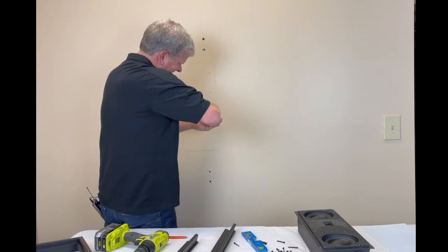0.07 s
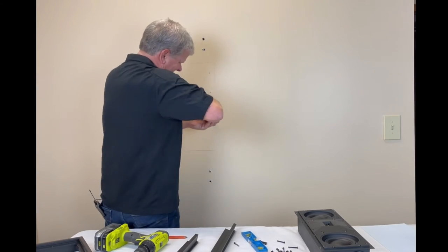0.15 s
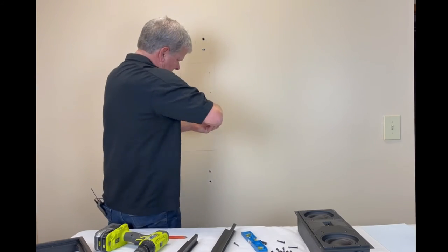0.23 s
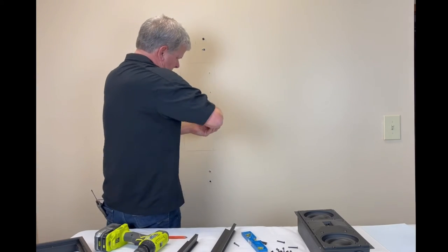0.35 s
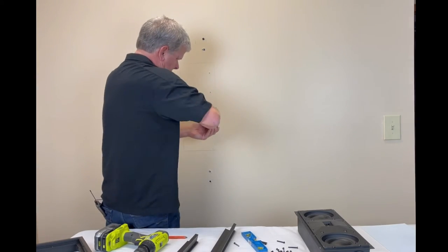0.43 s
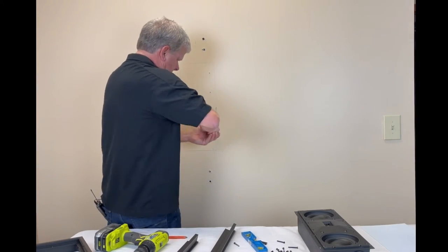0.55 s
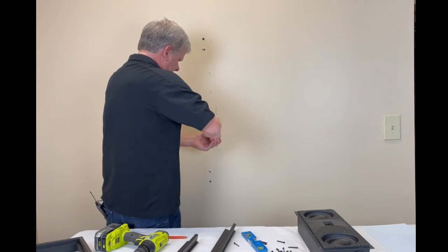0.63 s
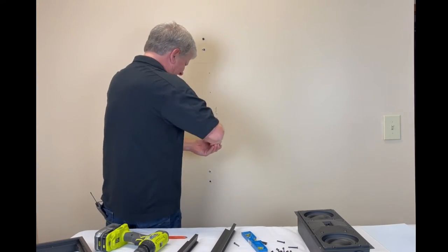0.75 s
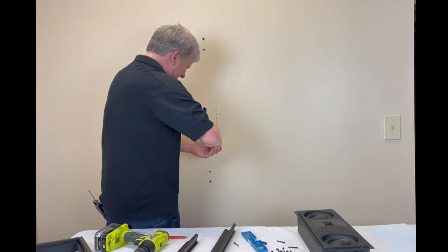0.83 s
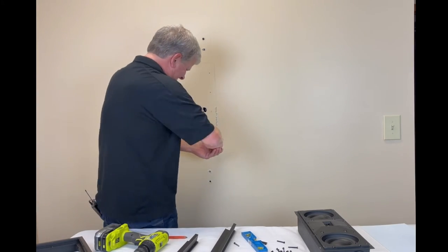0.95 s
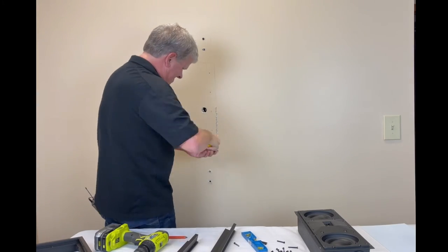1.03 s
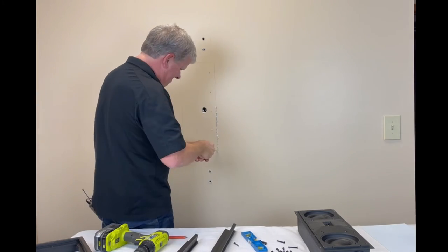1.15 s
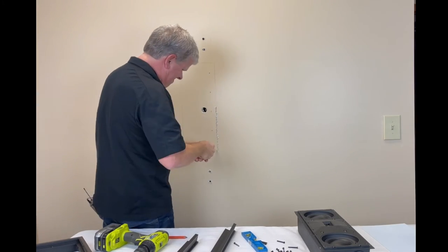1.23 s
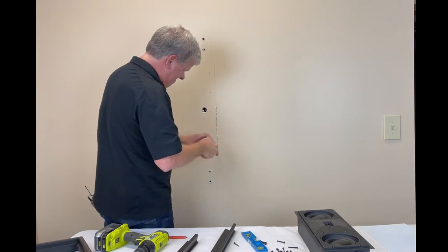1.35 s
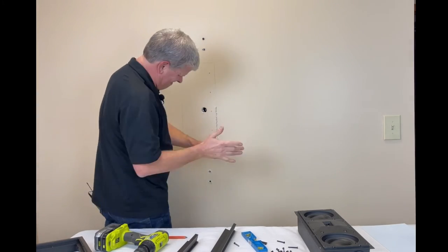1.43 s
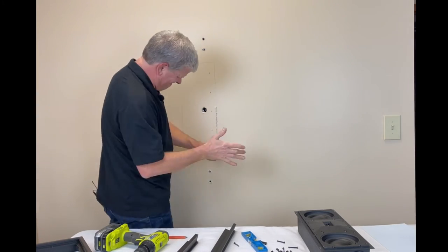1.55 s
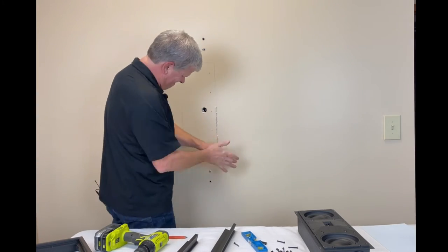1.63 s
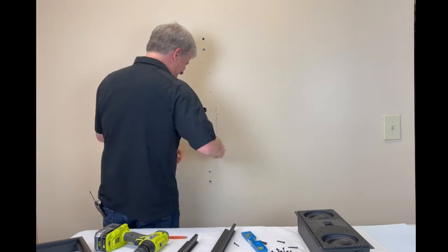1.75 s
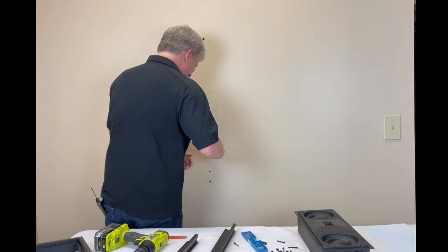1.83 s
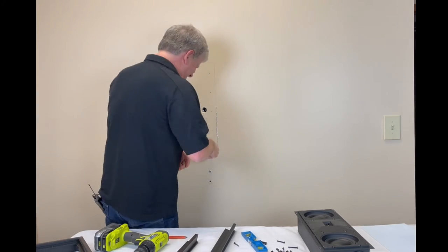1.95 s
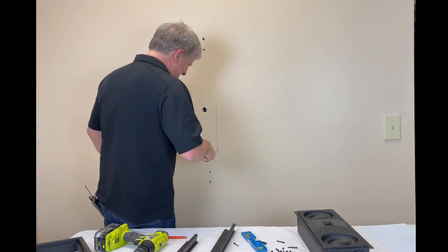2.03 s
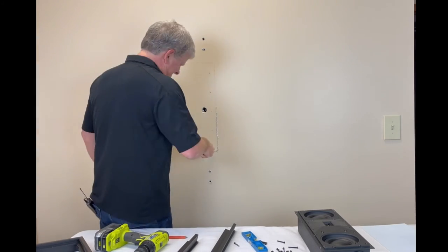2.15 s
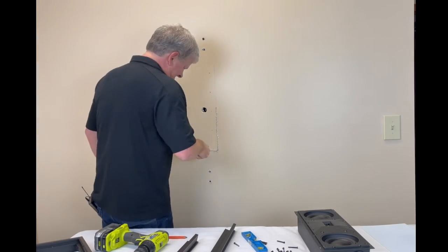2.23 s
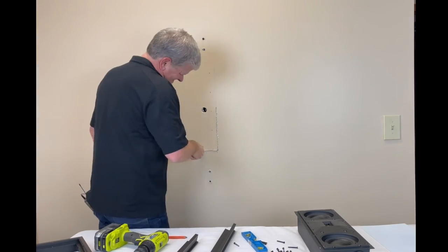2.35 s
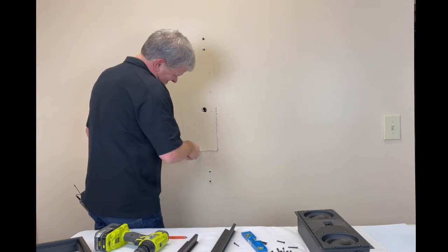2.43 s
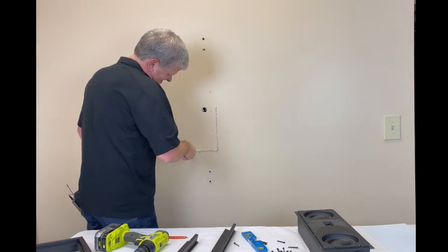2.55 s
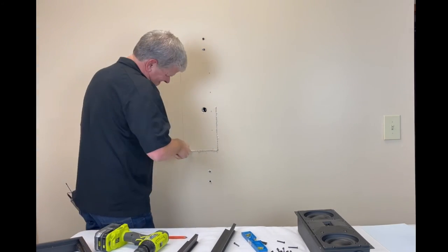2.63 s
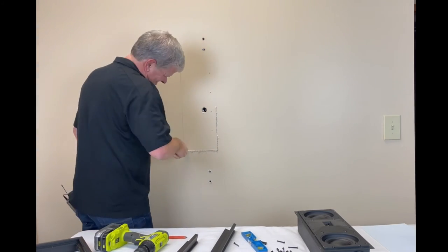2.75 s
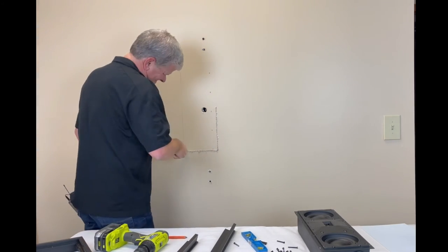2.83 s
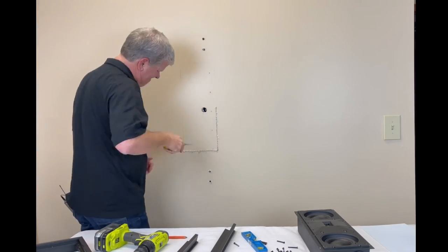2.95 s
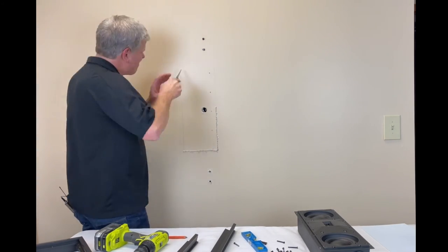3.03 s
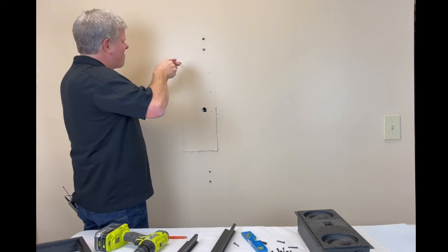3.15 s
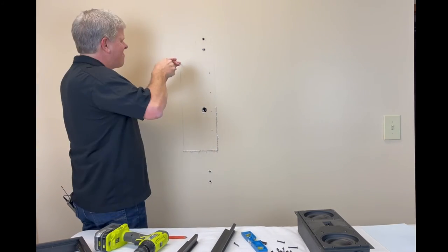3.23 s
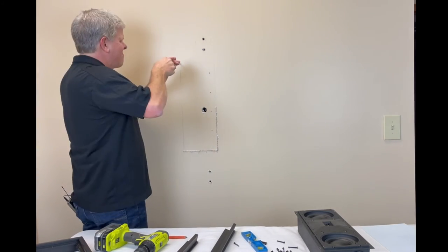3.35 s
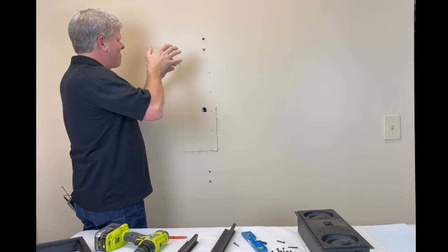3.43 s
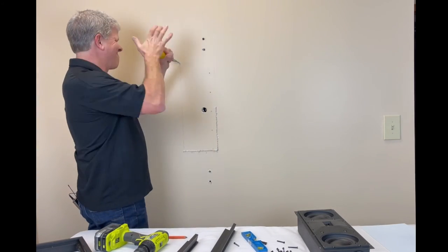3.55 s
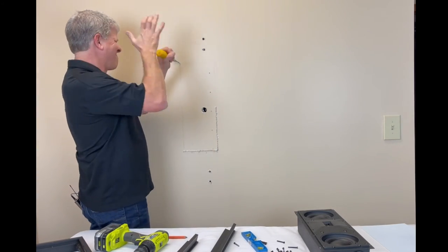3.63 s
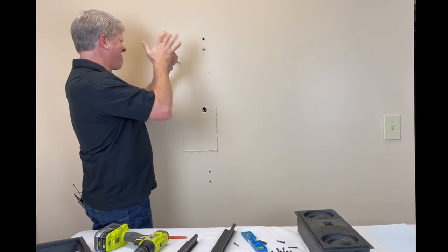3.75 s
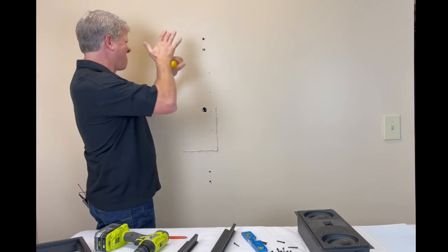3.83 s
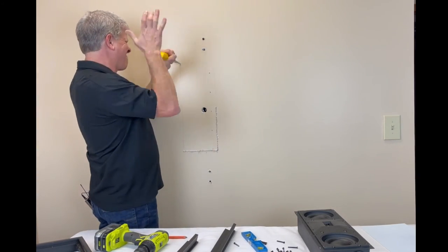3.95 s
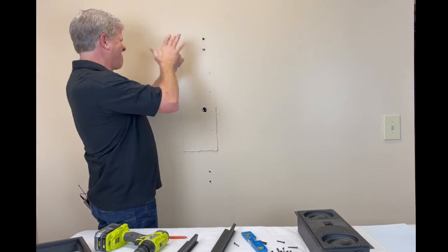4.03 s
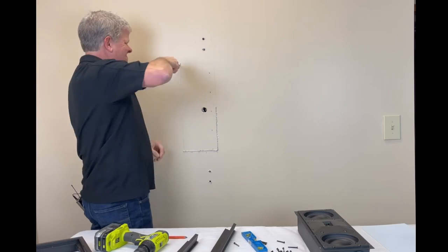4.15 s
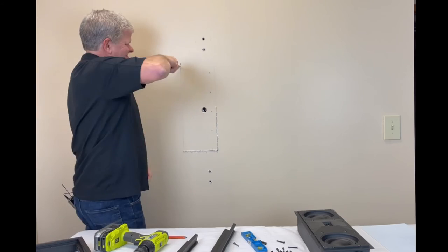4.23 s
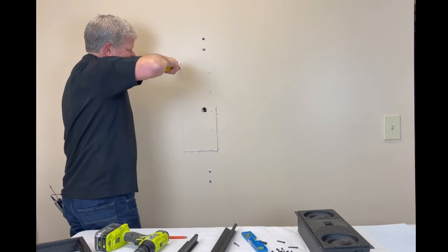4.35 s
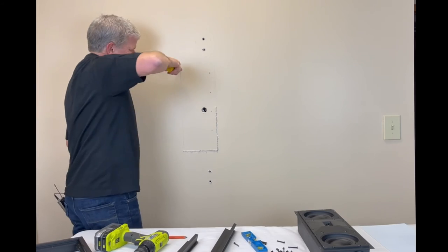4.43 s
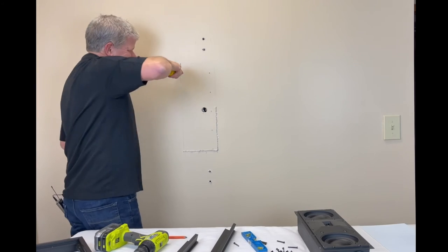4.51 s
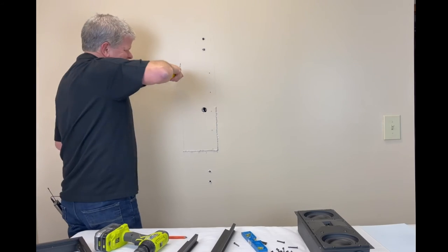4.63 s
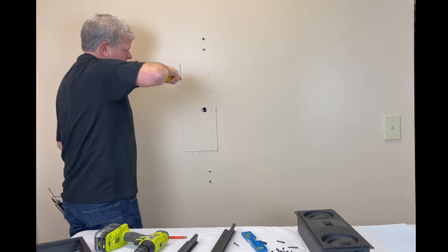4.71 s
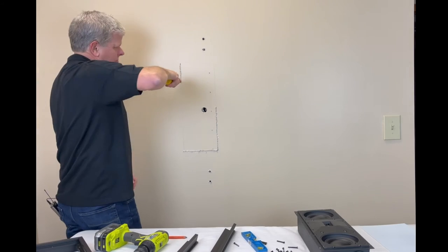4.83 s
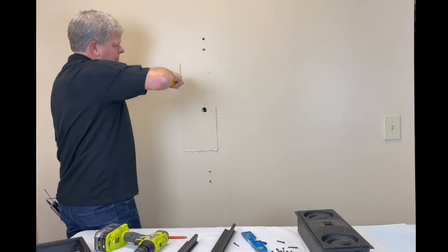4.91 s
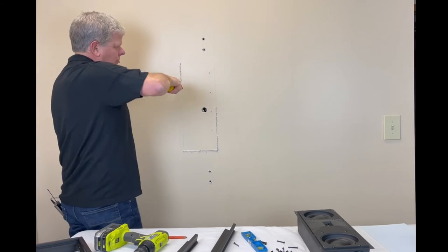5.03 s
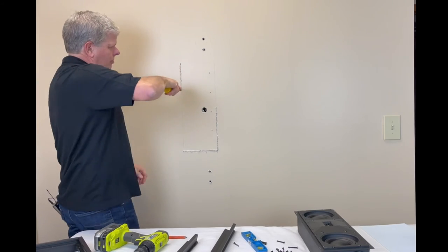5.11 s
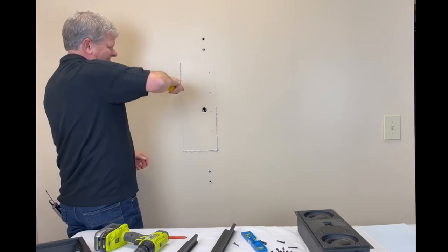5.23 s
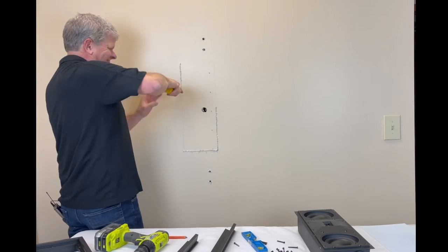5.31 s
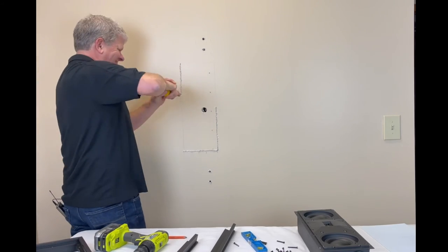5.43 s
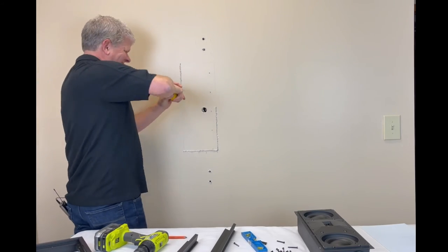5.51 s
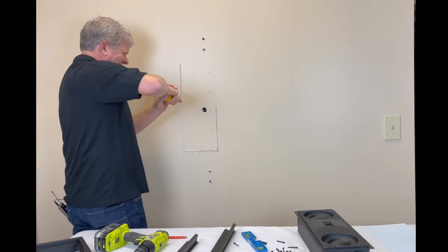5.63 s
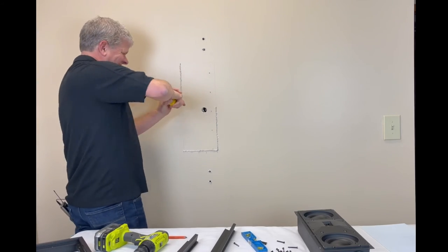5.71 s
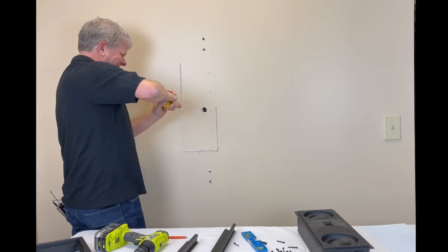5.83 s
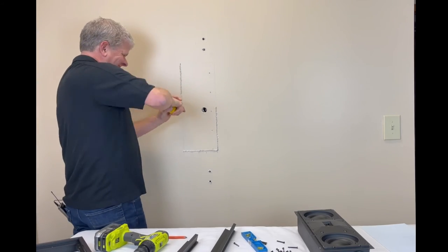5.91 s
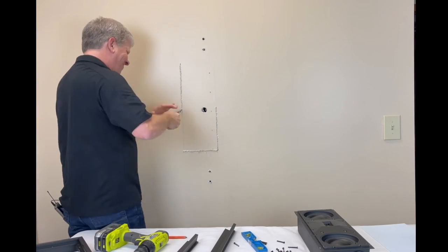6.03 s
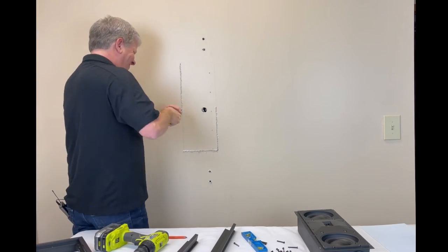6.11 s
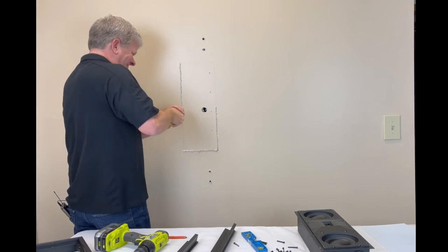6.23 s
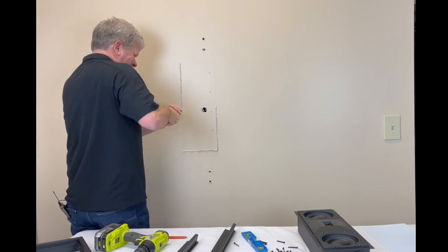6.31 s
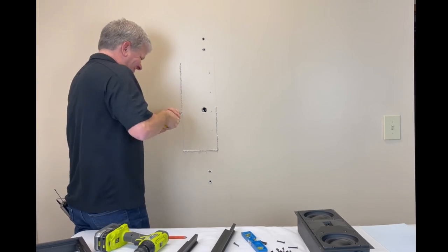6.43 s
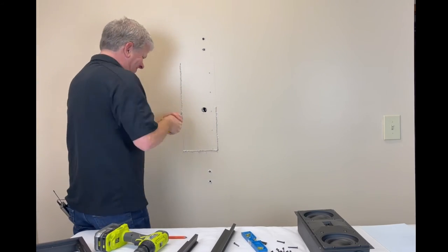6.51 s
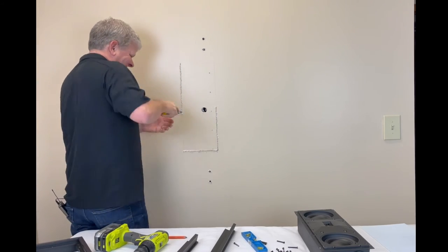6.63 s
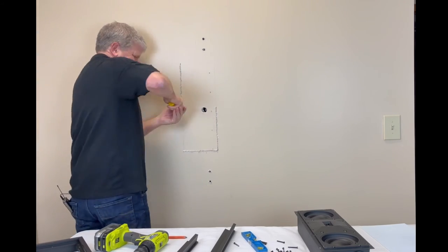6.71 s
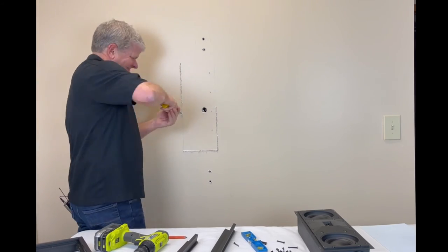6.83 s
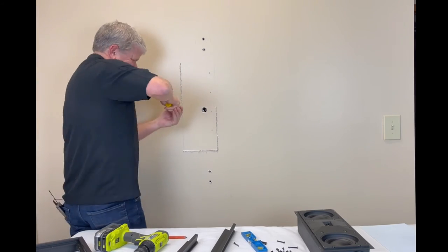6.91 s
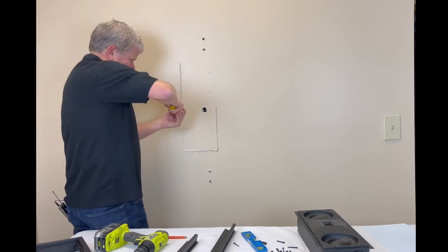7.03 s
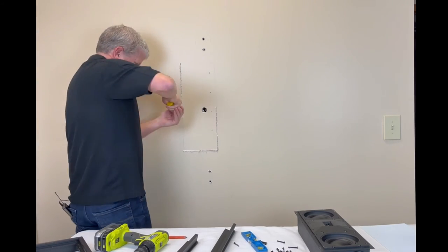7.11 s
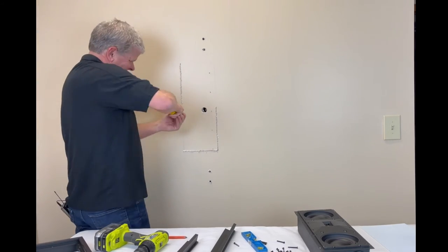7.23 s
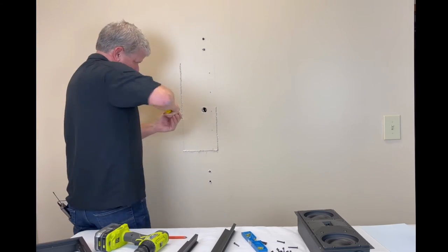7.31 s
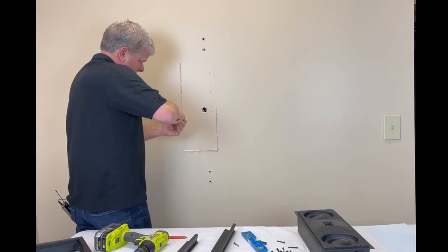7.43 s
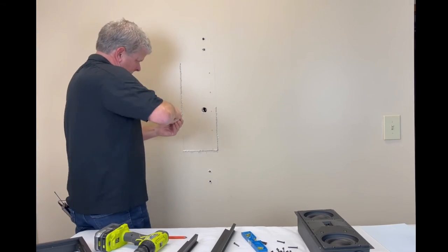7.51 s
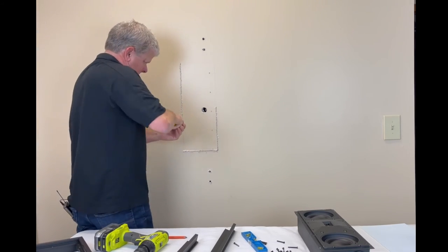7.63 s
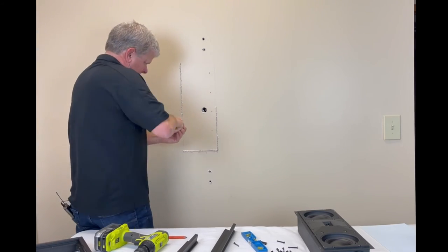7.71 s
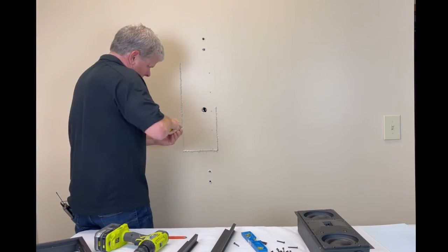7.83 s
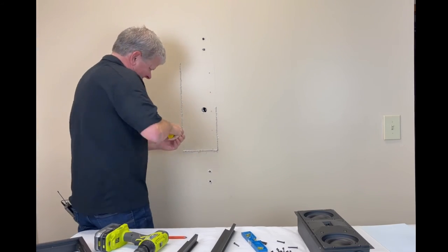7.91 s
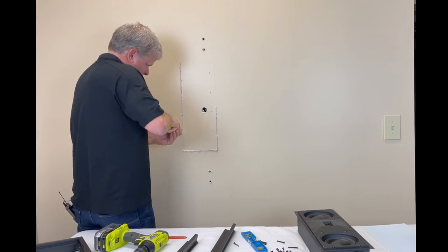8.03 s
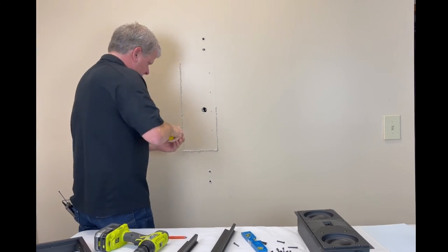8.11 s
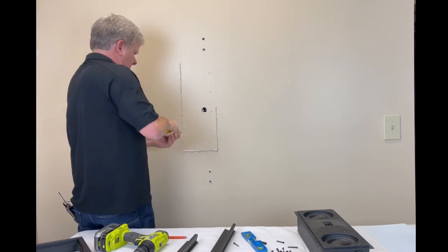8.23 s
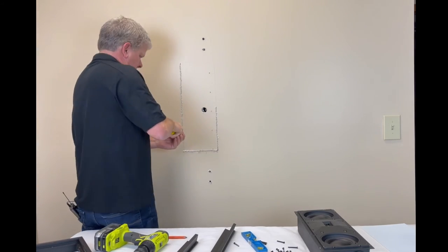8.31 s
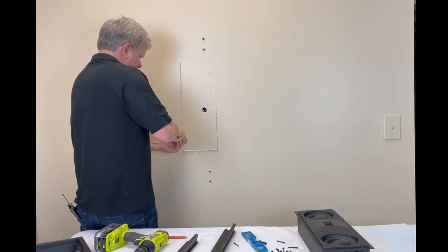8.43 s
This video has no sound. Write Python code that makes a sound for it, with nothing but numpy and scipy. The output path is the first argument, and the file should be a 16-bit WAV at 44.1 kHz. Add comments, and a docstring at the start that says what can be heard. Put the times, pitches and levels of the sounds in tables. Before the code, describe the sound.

Close stereo view of a hollow wall being cut by hand. Loud, fluttering saw strokes, around forty a second, come in runs with tiny gaps. Faint taps and a short burst of brightening knocks interrupt, sawing resumes, then stops for a longer roll of duller thuds ending in sharp clicks. Afterwards the rasp returns softer and grittier, hesitates with single scratches, and continues in short runs to the end. The small room is otherwise almost silent.

```python
"""Small room, plasterboard wall, two microphones: a toothed hand knife cuts the wall in fast runs.
Some forty short strokes a second, each a burst of tooth buzz and gypsum grit that rings the hollow panel.
Between cuts a palm drives the tip in and the wall is lightly touched: clicks, rings, thuds, a sliding hiss.
Noise and tones make each contact, panel modes colour the noise, and the pauses hold only a very faint hiss."""
import sys
import numpy as np
from scipy import signal
from scipy.fft import rfft, irfft, next_fast_len
from scipy.io import wavfile
from scipy.ndimage import uniform_filter1d

SR = 44100
rng = np.random.default_rng(int(sys.argv[2]) if len(sys.argv) > 2 else 0)


def unload_audio(sound):
    """Save the sound as a 16-bit wav file, at the path given as the first command line argument."""
    columns = np.transpose(np.atleast_2d(sound))
    # keep every value between -1 and 1, then stretch to whole-number steps
    steps = np.round(np.clip(columns, -1, 1) * 32767)
    wavfile.write(sys.argv[1], SR, steps.astype(np.int16))


N = 373086

# Times when the blade comes to a new part of the panel, and a closing bound: start_s
CUT_STARTS = [0, 3.3, 7.26, 9]
# Panel modes: pitch_hz, width_hz, then level_db over the colour when driven at the first, second, third cut
PANEL_MODES = [(198.5, 36.4, 19, 18, 16), (341.7, 84, 9.5, 15.3, 15.8), (495, 51.6, 24.5, 15.3, 18.7),
               (677.6, 43, 15, 15.2, 1.4), (746.5, 28, -8, 18.1, 14.7), (836, 30, 17, 12.8, 16.5),
               (1015, 180, 12.5, 7.8, 11), (1316, 97, 9.5, 7.3, 9.8), (1534, 33, -27, 5.6, 1.2),
               (2060, 140, 0.5, 1.3, 8.5), (2377, 520, 5.5, 1.9, 2.6), (2700, 110, 3, 5.1, 16.8),
               (2954, 250, 2.5, 7.2, 3.4), (3236, 200, 4.5, 7.4, 2.3), (3550, 230, 8, 2.4, 11),
               (3824, 81, -14.5, 1.2, 13.7), (4190, 120, 1.5, 8.7, 2.8), (4410, 330, 10, 7.8, 8.8),
               (4714, 200, 7, 3, 11.5), (4770, 150, -2, 3.6, 1), (5400, 1100, 3.5, 2.5, 2.3),
               (5870, 130, 1.5, 4.7, 2.1), (7100, 730, -15.5, 3.4, 4.8)]
# The panel between its modes: pitch_hz, level_db
PANEL_COLOUR = [(15, -64), (25, -22.5), (130, -27), (185, -12), (335, -1), (560, -5), (734, -5),
                (1330, 2.5), (1740, 0.5), (2110, -7), (2690, -19), (4250, -24), (16000, -32.5)]
# Where board and near walls cancel the sound: pitch_hz, width_hz, depth_db at the first, second, third cut
CANCELLATIONS = [(269, 23, 6.9, 2.7, 3.4), (550, 23, 4.7, 3.8, 1.1), (790, 17, 2.9, 14, 4.9),
                 (1250, 11, 1, 5.7, 3.9), (1644, 90, 23, 2.7, 18), (4664, 110, 3.4, 1.1, 6.5),
                 (5940, 260, 2.2, 3.3, 3.3)]
# Stereo width before an overall trim: pitch_hz, side_over_mid_db
STEREO_WIDTH = [(25, -23), (100, -18), (160, -36), (500, -15.5), (1000, -8.5), (4000, 4), (12000, 6.5)]
# Balance of the two microphones: pitch_hz, left_over_right_db
LEFT_BALANCE = [(500, 0.5), (4400, 2), (8000, 3.5), (12000, 1)]
# Scatter of phase between the microphones: pitch_hz, scatter_turns
DIFFUSION = [(2000, 0.15), (5000, 0.14), (12000, .25)]
# Palm blows on the handle, parts relative to the blow before fixed trims: start_s, level_db, ring_hz,
# ring_db, thud_hz, boom_db, treble_snap_db; the last, slide_db of the tip, is not relative
PALM_BLOWS = [(1.511, -33, 1305, -12.5, 464, 2.5, 6.5, -57.5), (1.567, -26.5, 1284, -4, 487, 3, 5.5, -56),
              (1.621, -19.5, 2130, 3.5, 503, -14, 8, -73.5), (1.67, -22.5, 1424, 0.5, 505, -5.5, 4, -57.5),
              (3.584, -37, 735, -4, 317, 4.5, 8, -59), (3.651, -27.5, 734, 0, 348, -1.5, 0, -57),
              (3.729, -26, 700, -2.5, 316, -4, -8, -56.5), (3.802, -29, 722, 0, 326, 0.5, -4, -57),
              (3.875, -25, 678, -10, 300, -3, -5, -57.5), (3.955, -27.5, 680, -5, 335, -4, -5.5, -63),
              (4.022, -23.5, 692, 0, 327, -5.5, 11.5, -85), (4.087, -26, 2175, 2, 333, -10, 14, -83)]
# Light touches on the wall, the dying end of a stroke at the start, and sharp onsets of some saw strokes:
# start_s, level_db, ring_hz, boom_db over the contact before fixed trims
LIGHT_CONTACTS = [(0.001, -29, 854, -1), (1.126, -55.5, 1080, 4), (1.153, -48.5, 1190, -14),
                  (1.169, -51, 1270, -9), (1.208, -42, 1400, -3), (1.248, -50, 887, -7),
                  (1.272, -55, 2620, -8), (1.292, -44.5, 1000, -4), (1.389, -51.5, 1270, -4),
                  (1.462, -59, 1100, -6), (1.739, -47, 890, -1), (1.774, -33, 1000, -4),
                  (1.818, -39.5, 960, -2), (1.861, -27.5, 1000, -6.5), (2.131, -30, 920, -1),
                  (3.015, -47.5, 910, 0), (3.058, -47, 1150, -5), (3.095, -69, 895, -4),
                  (3.168, -55.5, 1316, -11), (3.213, -68, 995, -11), (3.241, -78, 1205, -13),
                  (3.254, -62, 1200, -17), (3.324, -63, 1200, -39), (3.351, -48.5, 1080, -14),
                  (3.396, -56, 1090, -9), (3.428, -74, 1090, -10), (3.441, -57, 1090, -9),
                  (3.477, -71, 900, -1), (6.103, -42.5, 1130, -3), (6.15, -41, 1140, 0),
                  (6.72, -39.5, 1270, -7.5), (8.023, -35, 1310, -3.5), (8.216, -41.5, 1100, -2)]
# How the blade sits in the cut, before scatter and trims: start_s, boom_db, grit_db, clear_buzz_share (0-1)
BLADE_BITE = [(0, -9.5, -5.5, 0.57), (0.25, -15.5, -11.5, 0.74), (0.62, -13.5, -9.5, 0.7),
              (1.048, -11, -7.5, 0.44), (1.899, -8, -6.5, 0.5), (2.4, -15, -10, 0.71),
              (2.7, -10, -10, 0.65), (2.95, -6, -7.5, 0.4), (4.199, -11, -8, 0.5), (5, -15, -8.5, 0.43),
              (5.45, -11.5, -6.5, 0.47), (5.902, -9, -3.5, 0.18), (6.2, -3, -3, 0.2), (6.5, -5.5, -2, 0.45),
              (6.85, -6, -3.5, 0.77), (7.1, -7.5, -4.5, 0.42), (7.45, -6.5, -5, 0.69), (7.7, -9, -5, 0.67),
              (8.4, -10, -4.5, 0.63)]
# Even runs of push and pull, before scatter: first_s, last_s, count, first_push_db, last_push_db,
# pull_over_push_db, push_buzz_hz, pull_buzz_hz, pull_early_ms
STROKE_RUNS = [(0.068, 0.289, 10, -33, -30.5, -2, 1320, 1200, 0),
               (0.311, 0.517, 10, -31, -31, -1, 1250, 1270, 0),
               (0.536, 0.703, 10, -33, -35, 2.5, 1250, 1290, 0),
               (0.724, 0.831, 6, -35, -37, 2, 1000, 970, 0),
               (0.941, 1.011, 4, -34.5, -32.5, -4, 1000, 970, 0),
               (1.897, 2.042, 8, -35, -37, 1, 1390, 980, 0), (2.146, 2.23, 5, -38, -33, 2, 1380, 1000, 0),
               (2.27, 2.477, 11, -28.5, -29.5, -5, 1360, 1300, 0),
               (2.502, 2.625, 7, -33, -33, 2.5, 1230, 1330, 0),
               (2.652, 2.777, 7, -36.5, -36.5, 0, 1050, 1100, 0),
               (2.803, 2.948, 7, -38, -42.5, 0, 820, 1230, 0),
               (4.189, 4.235, 3, -43, -47.5, 0, 720, 710, 0),
               (4.298, 4.478, 9, -40, -35, -4.5, 950, 1250, 0),
               (4.503, 4.802, 15, -39.5, -39, 2.5, 800, 1030, 0),
               (4.871, 5.121, 12, -38, -37, -2, 1120, 730, 2),
               (5.262, 5.468, 10, -39, -38, 0, 800, 1200, 0),
               (5.495, 5.922, 18, -37, -40, 0, 1020, 1050, 3),
               (5.944, 6.043, 5, -37.5, -47, 0, 1000, 1000, 0), (6.315, 6.365, 3, -45, -47, 1, 900, 990, 0),
               (6.767, 6.85, 4, -42, -38, 0, 1130, 1080, 0), (7.087, 7.21, 6, -35, -39, -7, 1230, 755, 0),
               (7.29, 7.516, 10, -39.5, -39.5, -1, 980, 950, 0),
               (7.64, 7.95, 14, -40, -35, -2.5, 1110, 2030, 0),
               (8.026, 8.149, 6, -36, -35, -1, 1100, 1170, 0),
               (8.301, 8.452, 8, -38, -41, 0, 1150, 1100, 0)]
# Strokes set one by one: loud, weak or lone; the 2700 Hz row is the octave ring of the stroke at 7.589:
# middle_s, level_db, buzz_hz
SINGLE_STROKES = [(0.041, -52, 1250), (0.069, -26, 1465), (0.166, -25.5, 1443), (0.26, -27, 1318),
                  (0.402, -30, 1250), (0.535, -32.5, 1227), (0.576, -36, 1050), (0.666, -29, 1293),
                  (0.788, -33, 963), (0.866, -34.5, 1350), (1.048, -55, 940), (1.998, -32.5, 990),
                  (2.146, -43.5, 800), (2.209, -33, 1000), (2.269, -25.5, 1390), (2.332, -33.5, 998),
                  (2.394, -29.5, 1355), (2.48, -30, 1396), (2.565, -30.5, 1280), (2.603, -29.5, 1383),
                  (2.625, -32, 972), (2.693, -31, 1223), (2.777, -31, 1453), (2.871, -31, 1194),
                  (4.189, -36.5, 1320), (4.269, -42.5, 1574), (4.385, -30.5, 1424), (4.433, -34, 1367),
                  (4.676, -38, 1330), (4.697, -33.5, 1330), (4.738, -34.5, 1162), (4.848, -46.5, 660),
                  (4.963, -33, 1297), (5.05, -30.5, 1158), (5.12, -33.5, 1040), (5.182, -48.5, 1110),
                  (5.241, -34, 1330), (5.309, -33, 1303), (5.375, -28, 1605), (5.468, -36.5, 1160),
                  (5.646, -37.5, 1376), (5.769, -33.5, 1173), (6.184, -46.5, 744), (6.207, -47.5, 725),
                  (6.253, -57, 1460), (6.282, -47, 715), (6.408, -43.5, 770), (6.437, -39, 1260),
                  (6.456, -45.5, 993), (6.501, -50.5, 755), (6.527, -33, 1250), (6.551, -46.5, 970),
                  (6.575, -56, 724), (6.596, -50.5, 1040), (6.62, -44, 695), (6.691, -57, 800),
                  (6.93, -42.5, 690), (6.985, -48.5, 830), (7.005, -36, 1100), (7.04, -46, 732),
                  (7.063, -50.5, 1466), (7.21, -38, 1052), (7.442, -34, 1150), (7.54, -54.5, 703),
                  (7.588, -33.5, 2700), (7.589, -30, 1364), (7.687, -39, 2116), (7.76, -38.5, 2040),
                  (7.779, -40, 2036), (7.874, -34, 1157), (7.949, -35.5, 1146), (8.028, -33.5, 1310),
                  (8.051, -40.5, 1904), (8.079, -34, 1130), (8.173, -48, 710), (8.274, -40, 1354)]

TOP_HZ = 15830
# Scatter from stroke to stroke: time, level, share of pitch, share of length
UNEVEN_S, UNEVEN_DB, UNEVEN_PITCH, UNEVEN_LENGTH = .0007, 0.97, 0.02, .1
SAME_STROKE_S = .011  # a single this near a run's stroke takes its place
SECOND_HARMONIC_DB, THIRD_HARMONIC_DB = -23, -24.5  # for a stroke level with its neighbours
HARMONIC_GROWTH = 1  # dB more for each dB a stroke stands out
# Shares by which boom and grit follow the neighbouring strokes instead of their own
BOOM_EVENS, GRIT_EVENS = 0.68, 0.25
BITE_SHORTENS = 0.013  # drop in log length for each dB a stroke stands out
THUD_LAG_S = .003  # the heavy panel answers just after the tip's click
BLOW_TAIL_DB, LIGHT_TAIL_DB = -16, -11  # the room's answer relative to the contact, before trims
BLOW_RATTLE_DB, LIGHT_RATTLE_DB = -11, -12  # panel rattle before trims
RING_CLEARS = 0.26  # dB less rattle for each dB of a blow's ring
BLOW_THUD_T60_S, LIGHT_THUD_T60_S = .065, .028
LIGHT_RING_DB, LIGHT_THUD_HZ, LIGHT_SLIDE_DB = 4, 297, -38.5  # levels relative to the contact, before trims
SNAP_SHARE = 0.25  # what a light contact loses in boom it gains, by this share, in treble snap
FAINT_DB, FAINT_DRIES = -46, .8  # light contacts under this level lose room, dB per dB


def amp(db):
    """Decibels to an amplitude ratio."""
    return 10 ** (np.asarray(db) / 20)


def along(points, hz):
    """Reads (pitch, value) points on a log frequency axis."""
    point_hz, value = np.transpose(points)
    return np.interp(np.log(hz + 1), np.log(point_hz + 1), value)


def filtered(x, response):
    """Multiplies the spectrum of x by a complex response of frequency."""
    size = next_fast_len(N + SR // 2)
    return irfft(rfft(x, size) * response(np.fft.rfftfreq(size, 1 / SR)), size)[..., :N]


def laid(rows, times):
    """Sums one row of samples for each start time."""
    at = np.round(times * SR).astype(int)[:, None] + np.arange(rows.shape[1])
    return np.bincount(np.maximum(at, 0).ravel(), rows.ravel(), N)[:N]


def cut_at(s):
    """Index of the part of the panel being worked at each time."""
    return np.searchsorted(CUT_STARTS, s, "right") - 1


def hush():
    """A very faint hiss under everything, heard in the pauses: noise rolled off below 150 and above 900 Hz."""
    def band(hz):
        return 1 / (1 + (hz / 900) ** 2) / (1 + (150 / (hz + 1)) ** 4)
    return amp(-79.0) * filtered(rng.standard_normal(N), band)


def linger(power, room_db, t60):
    """Adds the room's exponentially dying share to a power envelope."""
    keep = amp(-120 / (t60 * SR))  # power falls 60 dB in t60
    return power + amp(room_db) ** 2 * signal.lfilter([1 - keep], [1, -keep], power)


def cancelled(x):
    """Board and near walls cancel the sound in narrow dips that change with the place of the cut."""
    cut = cut_at(np.arange(N) / SR)
    out = np.zeros(N)
    for place in range(len(CUT_STARTS) - 1):
        def dips(hz):
            response = 1
            for row in CANCELLATIONS:
                detune = row[0] ** 2 - hz * hz
                damping = 1j * hz * row[1]
                response = response * (detune + damping * amp(-abs(row[2 + place]))) / (detune + damping)
            return response
        out += filtered(x * (cut == place), dips)
    return out


def panel(hz, place):
    """Causal, minimum-phase response of the wall panel's modes, driven at one of the three cuts."""
    modes = sum(amp(m[2 + place]) ** 2 / (1 + (2 * (hz - m[0]) / m[1]) ** 2) for m in PANEL_MODES)
    magnitude = amp(along(PANEL_COLOUR, hz)) * np.sqrt(1 + modes)
    cepstrum = irfft(np.log(magnitude + 1e-6))
    cepstrum[1:len(hz)] *= 2  # folding the cepstrum forward makes the response causal
    cepstrum[len(hz):] = 0
    return np.exp(rfft(cepstrum))


def through_panel(boom, body, grit):
    """Noise under three power envelopes shakes the low, middle and high range of the panel."""
    out = np.zeros(N)
    cut = cut_at(np.arange(N) / SR)
    hz = np.fft.rfftfreq(next_fast_len(N + SR // 2), 1 / SR)
    low = 1 / (1 + (hz / 650) ** 6)
    high = 1 / (1 + (2500 / (hz + 1)) ** 6)
    for place in range(len(CUT_STARTS) - 1):
        wall = panel(hz, place)
        for power, part in ((boom, low), (body, 1 - low - high), (grit, high)):
            response = wall * np.sqrt(np.abs(part))
            response /= np.sqrt(np.mean(np.abs(response) ** 2))  # unit gain for white noise
            push = np.sqrt(np.abs(power)) * rng.standard_normal(N) * (cut == place)
            out += filtered(push, lambda _: response)
    return out


def buzz(hz, t, droop, wander):
    """A tone, sagging as teeth strike more slowly or a ring dies, with a random walk in phase."""
    steps = rng.standard_normal((len(hz), t.shape[1]))
    drift = np.cumsum(steps, axis=1) * wander / np.sqrt(SR)
    turns = hz[:, None] * (t - droop * t ** 2) + rng.random((len(hz), 1))
    return np.sqrt(2) * np.sin(2 * np.pi * turns + drift)


def jolts(s, db):
    """The lowest panel mode, started afresh by each blow or light contact as a short decaying sine."""
    t = np.arange(SR // 10)[None] / SR
    hz = 198 * amp(rng.normal(0, 0.51, (len(s), 1)))
    envelope = (1 - np.exp(-t / 0.005)) * amp(-60 * t / 0.073)
    return laid(amp(db)[:, None] * np.sin(2 * np.pi * hz * t) * envelope, s)


def contacts():
    """Blows and light contacts as columns: start, level, ring, thud, boom, snap, slide, room, rattle, decay."""
    rows = []
    for s, db, ring_hz, ring_db, thud_hz, boom_db, snap_db, slide_db in PALM_BLOWS:
        rattle_db = BLOW_RATTLE_DB - RING_CLEARS * ring_db
        rows.append((s, db, ring_hz, ring_db, thud_hz, boom_db, snap_db, slide_db - db,
                     BLOW_TAIL_DB, rattle_db, BLOW_THUD_T60_S))
    for s, db, ring_hz, boom_db in LIGHT_CONTACTS:
        tail_db = LIGHT_TAIL_DB + FAINT_DRIES * min(db - FAINT_DB, 0)
        rows.append((s, db, ring_hz, LIGHT_RING_DB, LIGHT_THUD_HZ, boom_db, -SNAP_SHARE * boom_db,
                     LIGHT_SLIDE_DB, tail_db, LIGHT_RATTLE_DB, LIGHT_THUD_T60_S))
    return np.transpose(rows)


def knocks():
    """Each contact clicks and rings, the panel thuds, then a hiss follows, as of a tip sliding into gypsum."""
    (s, db, ring_hz, ring_db, thud_hz, boom_db, snap_db, slide_db,
     tail_db, rattle_db, thud_t60) = contacts()
    t = np.arange(SR // 4)[None] / SR
    t60 = thud_t60[:, None]

    def fall(rise, t60):
        return (1 - np.exp(-t / rise)) ** 2 * amp(-120 * t / t60)

    def power(level_db, shape, lag=0):
        return laid(amp(level_db)[:, None] ** 2 * shape, s + lag)

    tail = amp(tail_db)[:, None] ** 2 * fall(0.0092, 0.2)  # the room's answer
    slide = power(db + slide_db, np.exp(-((t - .024) / 0.013) ** 4))
    slide = linger(slide, -12.5, 0.21)
    boom = power(db + boom_db - 8.5, fall(0.0028, 1.7 * t60) + 7.7 * tail, THUD_LAG_S)
    body = power(db + rattle_db, fall(0.0014, 0.94 * t60)) + power(db - 7.5, tail)
    grit = power(db - 24.0 + snap_db, fall(0.00036, 0.054) + 0.22 * tail)
    hiss = np.sqrt(slide) * rng.standard_normal(N)
    hiss = amp(-5.5) * filtered(hiss, lambda hz: 1 / (1 + (5000 / (hz + 1)) ** 2))

    ring = buzz(ring_hz, t, droop=0.34, wander=9.5) * np.sqrt(fall(0.004, 0.014 + 0.31 * t60))
    thud = np.sin(2 * np.pi * thud_hz[:, None] * t) * np.sqrt(fall(0.003, t60))
    tones = laid(amp(db + ring_db - 5.0)[:, None] * ring, s)
    tones += jolts(s, db + boom_db - 8.0)
    tones += laid(amp(db + boom_db - 2.5)[:, None] * thud, s + THUD_LAG_S)
    # the panel radiates no deep bass
    tones = signal.sosfilt(signal.butter(4, 150, "high", fs=SR, output="sos"), tones)
    return through_panel(boom, body, grit + slide) + hiss + tones


def strokes():
    """Time, level and buzz of every stroke: runs alternate push and pull with scatter; singles do not scatter."""
    rows = []
    for first, last, count, first_db, last_db, pull_db, push_hz, pull_hz, early_ms in STROKE_RUNS:
        k = np.arange(round(count))
        pull = k % 2
        luck = rng.standard_normal((len(k), 3))
        s = np.linspace(first, last, len(k)) - pull * early_ms / 1000 + UNEVEN_S * luck[:, 0]
        db = np.linspace(first_db, last_db, len(k)) + pull * pull_db + UNEVEN_DB * luck[:, 1]
        hz = np.where(pull, pull_hz, push_hz) * (1 + UNEVEN_PITCH * luck[:, 2])
        rows += zip(s, db, hz)
    rows, singles = np.array(rows), np.array(SINGLE_STROKES)
    free = np.abs(rows[:, :1] - singles[:, 0]).min(axis=1) > SAME_STROKE_S
    rows = np.vstack([rows[free], singles])
    return rows[np.argsort(rows[:, 0])].T


def chimes(s, t, low_hz, high_hz):
    """Every stroke rings the panel modes of a range as clean tones, each at a new strength and pitch."""
    modes = np.array([m for m in PANEL_MODES if low_hz < m[0] < high_hz])
    level = amp(along(PANEL_COLOUR, modes[:, 0]) + modes[:, 2:].T[cut_at(s)])
    luck = rng.standard_normal((3, *level.shape))  # strength, pitch, phase
    level *= amp(7.0 * np.minimum(luck[0], 1.4) - 8.0) / np.linalg.norm(level, axis=1, keepdims=True)
    hz = modes[:, 0] + 0.31 * modes[:, 1] * luck[1]
    tones = np.sin(2 * np.pi * (hz[..., None] * t + luck[2, ..., None]))
    return np.sqrt(2) * np.einsum("sm,smt->st", level, tones)


def saw():
    """Each stroke swells and dies in a short burst; the grit peaks a little before the buzz."""
    s, db, hz = strokes()
    at, *columns = np.transpose(BLADE_BITE)
    boom_db, grit_db, clear = [np.interp(s, at, column) for column in columns]
    luck = rng.standard_normal((len(s), 3)) * [.05, 2.2, 1.8]  # clear share, boom dB, grit dB
    clear = np.clip(clear + luck[:, 0], .02, .95)[:, None]
    stands_db = db - uniform_filter1d(db, size=5)  # level over the neighbouring strokes
    effort_db = db - 0.026 * stands_db  # the arm works more evenly than the buzz sounds
    grit_db = grit_db - GRIT_EVENS * stands_db
    t = np.arange(-800, 800)[None] / SR
    start = s + t[0, 0]
    length = np.exp(UNEVEN_LENGTH * rng.standard_normal(len(s)) - BITE_SHORTENS * stands_db)[:, None]

    def swell(lead, width):
        return np.exp(-((t + lead) / (width * length)) ** 2)

    def power(level_db, shape):
        return laid(amp(level_db)[:, None] ** 2 * shape, start)

    boom = power(effort_db - BOOM_EVENS * stands_db + boom_db + luck[:, 1], swell(0, 0.011))
    body = power(effort_db, 0.48 * (1 - clear) * swell(0.00042, 0.0055))
    grit = power(effort_db + grit_db - 2.5 + luck[:, 2], swell(0.0029, 0.0044))

    tone = buzz(hz, t, droop=1.6, wander=3)
    for harmonic, over_db in ((2, SECOND_HARMONIC_DB), (3, THIRD_HARMONIC_DB)):
        level = amp(over_db + HARMONIC_GROWTH * stands_db)[:, None]
        tone += level * buzz(harmonic * hz, t, droop=1.6, wander=12)
    teeth = laid(amp(db + 1.65)[:, None] * np.sqrt(clear * swell(-0.0003, 0.0034)) * tone, start)
    lower = chimes(s, t, 400, 1100) * np.sqrt((1 - clear) * swell(-0.001, 0.0073))
    teeth += laid(amp(effort_db - 7)[:, None] * lower, start)
    upper = chimes(s, t, 1800, 9000) * np.sqrt(swell(0.0022, 0.0052))
    teeth += laid(amp(effort_db + grit_db - 0.3)[:, None] * upper, start)
    noise = through_panel(linger(boom, 1.9, 0.1), linger(body, -0.7, 0.17), linger(grit, -4.0, 0.14))
    return teeth + noise


def scene():
    """Two microphones differ most in the treble, by fixed paths off near walls and by the diffuse room."""
    mid = cancelled(saw() + knocks()) + hush()
    spectra = signal.stft(mid, nperseg=256)[2]
    fixed_turns = rng.random((len(spectra), 1))
    scatter = along(DIFFUSION, np.linspace(0, SR / 2, len(spectra)))[:, None]
    turns = fixed_turns + scatter * rng.standard_normal(spectra.shape)
    scattered = signal.istft(spectra * np.exp(2j * np.pi * turns), nperseg=256)[1][:N]
    side = filtered(scattered, lambda hz: amp(along(STEREO_WIDTH, hz) - 5.0))
    pair = np.array([mid + side, mid - side])
    return filtered(pair, lambda hz: amp(np.outer([.5, -.5], along(LEFT_BALANCE, hz))))


def record(dry):
    """Nothing is kept above the band limit."""
    return filtered(dry, lambda hz: hz < TOP_HZ)


dry = scene()
out = record(dry)
unload_audio(out)
```